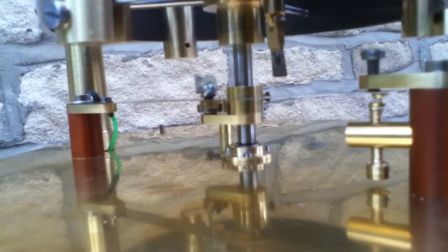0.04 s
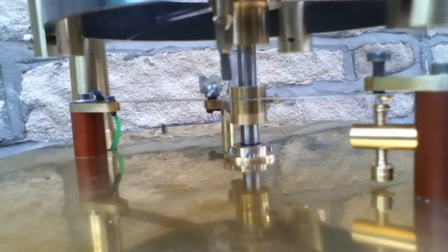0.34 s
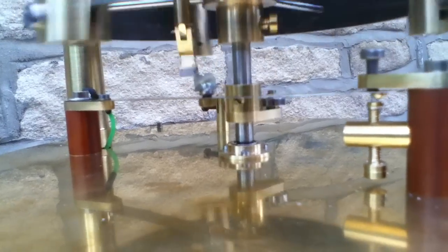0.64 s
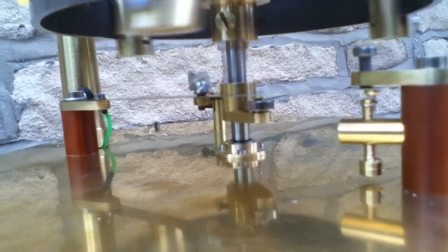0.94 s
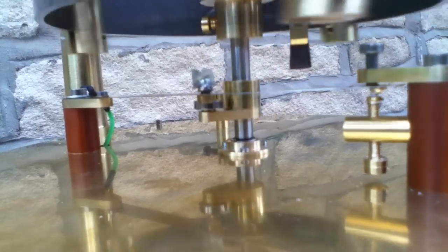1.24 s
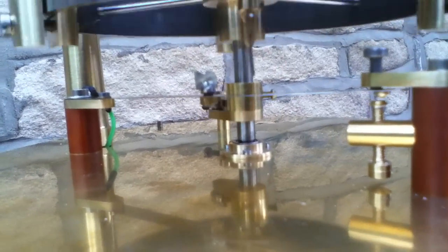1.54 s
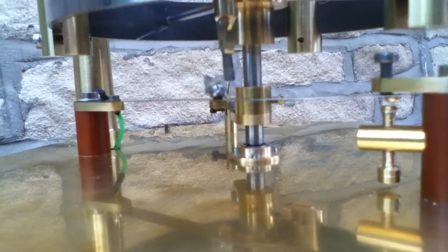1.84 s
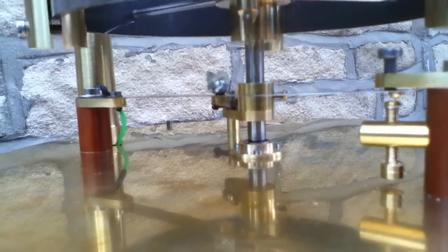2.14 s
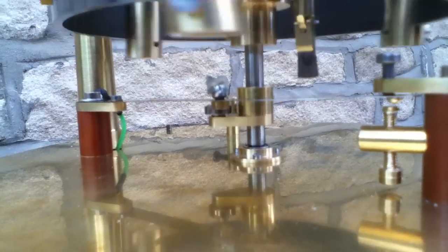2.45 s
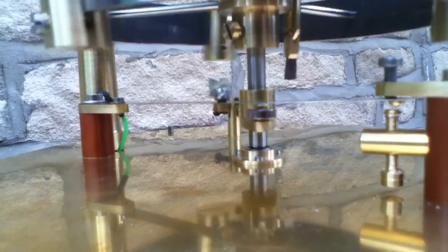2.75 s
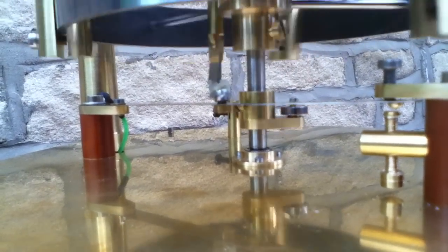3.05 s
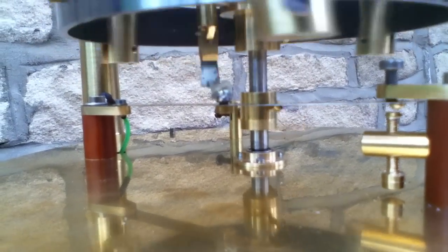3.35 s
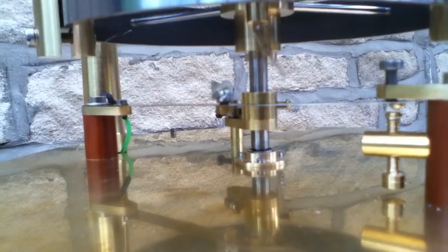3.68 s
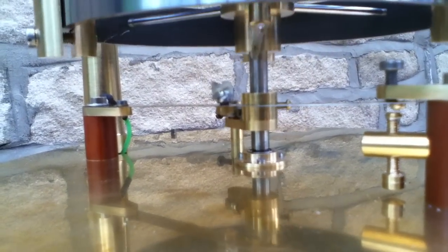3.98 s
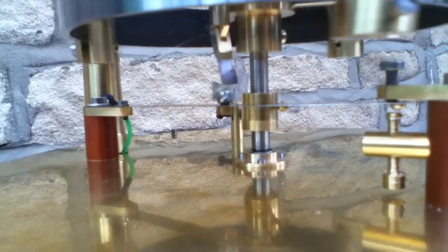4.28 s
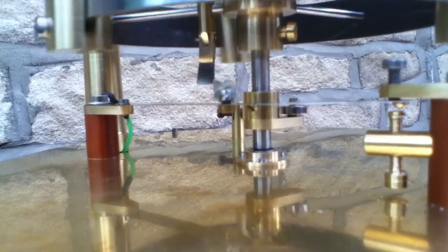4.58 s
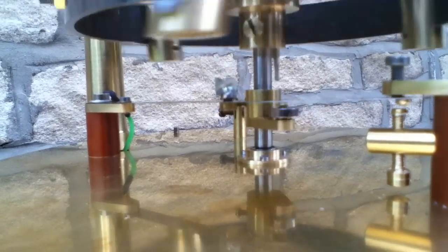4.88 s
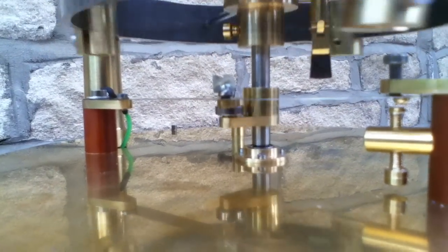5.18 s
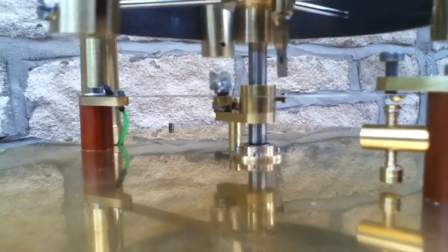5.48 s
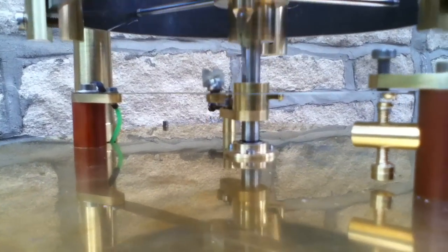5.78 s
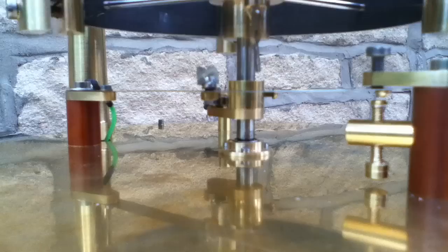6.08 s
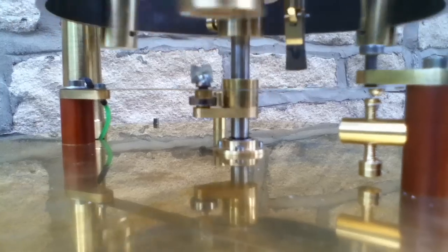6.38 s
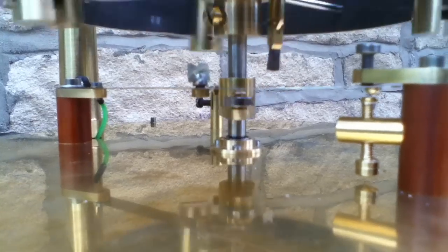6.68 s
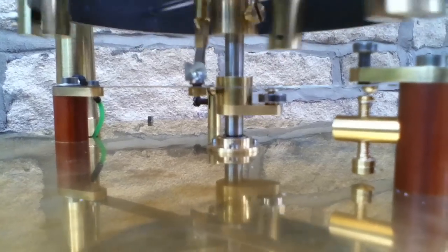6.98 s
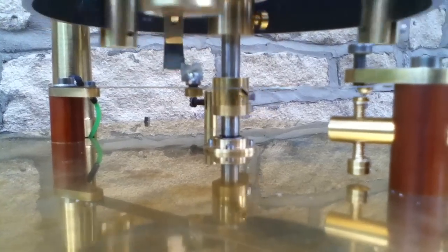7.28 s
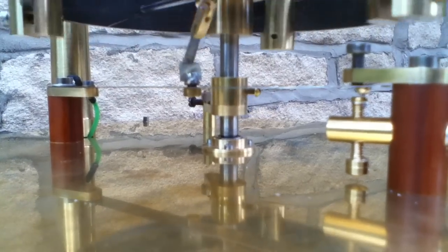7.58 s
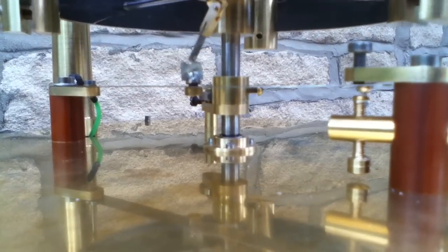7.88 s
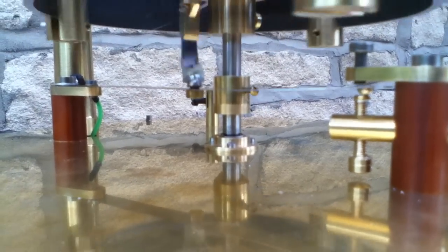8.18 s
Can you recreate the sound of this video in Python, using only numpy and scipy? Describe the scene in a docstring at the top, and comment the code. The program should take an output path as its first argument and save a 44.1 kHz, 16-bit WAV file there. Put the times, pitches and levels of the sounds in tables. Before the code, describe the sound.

A large clock balance wheel swings back and forth close to the microphone. Its loose metal fittings scrape, tick and faintly squeak, making the wheel ring, most busily at first. Four times a hanging toggle drags over a brass block and drops off with a sharp clack, with brief whirrs around it. At the end a thin spring buzzes and the toggle crashes onto the block. The quiet room has a low hiss, rumble and hum.

```python
"""A large clock balance wheel turns back and forth close by, over a quiet room's hiss, rumble and hum.
From the start its loose hanging fittings scrape, tick and squeak, ringing the wheel. At 0.5 s a hanging
toggle drags over a brass contact block and drops off with a sharp clack; it passes again at 3.5, 4.4
and 7.5 s, its hanger whirring on the way. Near 8.1 s the toggle flicks a thin contact spring and
crashes onto the block."""
import sys
import numpy as np
from scipy import signal
from scipy.io import wavfile
from scipy.ndimage import uniform_filter1d

SR = 44100
rng = np.random.default_rng(int(sys.argv[2]) if len(sys.argv) > 2 else 0)


def wav_out(sig):
    """Save sig, one row per channel (or a flat mono array), as 16-bit PCM at SR to the path in sys.argv[1]."""
    wavfile.write(sys.argv[1], SR, np.round(np.clip(np.atleast_2d(sig).T, -1, 1) * 32767).astype(np.int16))


N = 362943
TIME = np.arange(N) / SR
REBOUND_GAP_S = .017

# toggle passes over the block: touch t/s, far-edge catch t/s, drop t/s, slide/dB, catch/dB, drop/dB
TOGGLE_PASSES = [(0.502, 0.627, .65, -47.5, -29.5, -21), (3.482, 3.615, 3.648, -51.5, -35.5, -17.5),
                 (4.377, 4.503, 4.525, -48.5, -35.5, -23), (7.4885, 7.659, 7.699, -55.5, -34.5, -18)]
# envelope of dense weak modes: f/Hz, level/dB
WASH_SPECTRUM = [(150, -7.5), (450, -3), (950, -11.5), (1400, 3), (1750, -25), (2400, -14), (3200, 2),
                 (5000, 3.5), (7700, 2.5), (9300, -6.5), (11000, -8.5), (12800, -15), (15800, -21)]


def wheel(rub_db=-3, rub_rise_s=.013, rub_t60_s=.36, tick_db=-8, tick_rise_s=.004, tick_t60_s=.12):
    """Loose fittings drive the wheel by rubbing under uneven pressure and by short bursts of slip."""
    # t/s, length/s, level/dB, swell over the stroke/dB, brightness/dB
    rubs = [(0.097, 0.23, -68.5, 8.5, 17), (.26, 0.21, -53.5, 10, -4), (0.488, 0.2, -47.5, 0, -12.5),
            (0.687, 0.13, -36, -0.5, -3), (0.899, 0.34, -34, 0, 5), (1.636, .1, -51.5, -0.5, 4),
            (1.803, 0.41, -53, 0, -8), (2.8, 0.17, -48, 4, 4), (3.042, 0.084, -55.5, -2, -17.5),
            (3.31, .31, -51, -1, -6), (3.679, 0.2, -36.5, -11, 0), (4.041, 0.11, -59.5, 12, 1),
            (4.22, 0.41, -53, 4, -7.5), (4.868, 0.1, -54, 2.5, 3), (5.034, 0.035, -50, 0, 10),
            (5.181, 0.065, -49, -7, 2), (6.693, 0.035, -53, -1.5, 12), (6.875, 0.055, -57.5, 3.5, 15),
            (7.283, 0.33, -53, -4, -12), (7.958, 0.098, -61, 2, -20), (8.156, .07, -50, -2, -6)]
    # t/s, level/dB, brightness/dB
    ticks = [(0.6914, -22.5, 12), (0.7993, -40, -3), (.921, -20, 11.5), (1.0274, -27, -12),
             (1.095, -23, 12), (1.213, -24.5, 14), (1.6444, -32, 0), (1.6893, -36, 2), (1.7293, -36.5, 6),
             (1.7945, -31, -1), (1.8355, -31, 5), (1.8607, -32, 6), (1.8949, -29.5, 8), (1.94, -35.5, 8),
             (1.9624, -32.5, 1), (2.0389, -29.5, 10.5), (2.1219, -31.5, 6), (2.1611, -32, -2),
             (2.7216, -34, 6), (2.7997, -42.5, 18), (3.8413, -32.5, 13), (4.1994, -36.5, -8),
             (6.82, -48.5, 17)]
    push = np.zeros(N)
    for s, length_s, db, swell_db, bright_db in rubs:
        t = np.arange(0, length_s + rub_t60_s, 1 / SR)
        waver_db = 1.93 * wander(len(t), step_s=.032)
        pressure = amp(db + swell_db * np.minimum(t / length_s, 1) + waver_db)
        contact = np.minimum(t / rub_rise_s, 1) * fade(np.maximum(t - length_s, 0), rub_t60_s)
        rub = slips(len(t), per_s=3500, spread_db=3) * pressure * contact
        add(push, s, amp(rub_db) * brighten(rub, bright_db))
    t = TIME[:SR // 4]
    envelope = np.minimum(t / tick_rise_s, 1) * fade(t, tick_t60_s)
    for s, db, bright_db in ticks:
        burst = slips(len(t), per_s=9000, spread_db=2.5) * envelope
        add(push, s - tick_rise_s, amp(db + tick_db) * brighten(burst, bright_db))
    return wheel_body(push)


def wheel_body(push, wash_db=-11.5, wash_t60_s=.045):
    """The pushed wheel rings in clear modes over a crowd of weak, overlapping ones."""
    # f/Hz, width/Hz, level/dB
    modes = [(1262, 8.3, 4), (1972, 19, 2.5), (2214, 110, -4), (2587, 31, -3), (3072, 34, 4.5),
             (3287, 126, 4.5), (3394, 33, 4), (4320, 60, -4), (5698, 23, 1), (5724, 42, 0.5), (6200, 19, 6),
             (6540, 150, -4.5), (7610, 115, 4.5), (7630, 26, -7), (8090, 50, -29), (8610, 82, -10),
             (9800, 28, -2.5), (9740, 35, -19)]
    tap = signal.unit_impulse(SR // 8)
    clear = sum(amp(db) * resonate(tap, hz, width_hz) for hz, width_hz, db in modes)
    crowd = rng.standard_normal(len(tap)) * fade(TIME[:len(tap)], wash_t60_s)
    wash = colour(.5 * tap + crowd / np.linalg.norm(crowd), WASH_SPECTRUM)
    response = clear + amp(wash_db) * wash
    return signal.fftconvolve(push, response / np.linalg.norm(response))[:N]


def blows(clack_t60_s=.057, touch_t60_s=.065, rebound_db=-14.5, loss_db=2.5):
    """Toggle hits on the block: t/s, level/dB, t60/s, brightness/dB, base plate thud/dB."""
    # knocks outside the passes, then the crash: t/s, level/dB, brightness/dB
    knocks = [(5.2041, -40.5, -6.5), (6.641, -52, -16), (7.792, -38.5, -4), (7.839, -45, -11),
              (8.038, -44, -20.5), (8.105, -25, 13), (8.1133, -10, 8), (8.128, -13.5, 6), (8.145, -27, 15),
              (8.153, -17.5, -4), (8.163, -23.5, 0)]
    rows = [(s, db, clack_t60_s, bright_db, 0) for s, db, bright_db in knocks]
    for touch_s, catch_s, drop_s, _, catch_db, drop_db in TOGGLE_PASSES:
        rows.append((touch_s, -29, touch_t60_s, 1.5, 5))
        rows.append((catch_s, catch_db, touch_t60_s, -6.5, 0))
        rows.append((drop_s, drop_db, clack_t60_s, -4.5, 0))
        for k in range(3):
            rebound_s = drop_s + (k + 1) * REBOUND_GAP_S
            rows.append((rebound_s, drop_db + rebound_db - k * loss_db, clack_t60_s, -6.5, 0))
    return rows


def clacks(gain_db=-5, ring_db=-10, snap_db=-12, vary_db=5, rise_s=.0022, plate_hz=2300):
    """Each blow snaps, cracks and rings the block; the contact point shifts the mix of modes."""
    # toggle and block: f/Hz, level/dB, t60/s
    modes = [(720, -23, .08), (1040, -16, .08), (1232, -6, .11), (1310, -12, .08), (1410, -14, .07),
             (1600, -8, .07), (1900, -10, .09), (2516, -12, .16), (3473, -5, .1), (3595, -7, .07),
             (3770, -7, .06), (3887, -3, .1), (3939, -2, .1), (4388, -6, .1), (4452, -1, .12),
             (4720, -8, .07), (4800, -8, .07), (4991, -7, .09), (5350, -8, .09), (5569, -5, .1),
             (6640, -9, .06), (7020, -13, .09), (7524, -3, .12), (7956, -5, .12), (8800, -14, .1),
             (9848, -15, .13), (11165, -15, .08), (13790, -22, .18), (14163, -20, .11)]
    # f/Hz, level/dB
    crack_spectrum = [(200, -25), (900, -21.5), (1250, -18.5), (2200, -10), (2900, -14.5), (3600, 10),
                      (4700, -1.5), (6000, -1.5), (6900, -2), (7250, -0.5), (7600, -5), (11300, -11),
                      (12700, -24), (15800, -28)]
    out, t = np.zeros(N), TIME[:SR // 4]
    hz, mode_db, mode_t60_s = np.transpose(modes)[:, :, None]
    for s, db, t60_s, bright_db, thud_db in blows():
        gains = amp(mode_db + vary_db * rng.uniform(-1, 1, hz.shape) + thud_db * (hz < plate_hz))
        partials = np.sin(2 * np.pi * (hz * t + rng.random(hz.shape)))
        ring = (gains * fade(t, mode_t60_s) * partials).sum(0)
        spectrum = [(f, level + thud_db * (f < plate_hz)) for f, level in crack_spectrum]
        crack = unit(colour(slips(len(t), per_s=11000, spread_db=-.3), spectrum)) * fade(t, t60_s)
        crack = brighten(crack, 9 * fade(t, t60_s=.017) - 2)  # first contact is hardest
        blow = (crack + amp(ring_db) * ring) * np.minimum(t / rise_s, 1)
        blow /= np.std(blow[:SR // 200])
        snap = amp(snap_db) * unit(np.diff(rng.standard_normal(len(t) + 1))) * fade(t, t60_s=.0083)
        add(out, s - rise_s, amp(db + gain_db) * (brighten(blow, bright_db) + snap))
    return out


def drags(settle_s=.107, settle_db=-33):
    """The toggle's edge chatters across the block, and again as it settles after the drop."""
    # f/Hz, width/Hz, level/dB
    rasp_modes = [(2410, 22, 7), (3760, 260, -7), (3960, 164, 7), (4540, 73, -2), (6450, 290, 0),
                  (7400, 43, -16), (8100, 52, -5), (12040, 80, -20)]
    out = np.zeros(N)
    for touch_s, _, drop_s, slide_db, _, drop_db in TOGGLE_PASSES:
        slide = (touch_s, drop_s - touch_s, slide_db)
        settle = (drop_s + REBOUND_GAP_S, settle_s, drop_db + settle_db)
        for s, length_s, db in (slide, settle):
            count = round(length_s * SR)
            push = slips(count, per_s=1200, spread_db=4)
            rasp = sum(amp(level) * resonate(push, hz, width_hz) for hz, width_hz, level in rasp_modes)
            add(out, s, amp(db) * unit(rasp) * signal.windows.tukey(count, .2))
    return out


def spring(buzz_db=-15):
    """The flicked contact spring buzzes against the toggle, which keeps its modes ringing."""
    # t/s, level/dB, buzz t60/s
    flicks = [(8.072, -45.5, 0.038), (8.096, -25, 0.12), (8.205, -28.5, 0.061), (8.217, -39, 0.064)]
    # f/Hz, level/dB, ring time scale/s
    modes = [(1280, 10, 0.091), (3860, -7.5, .015), (4450, 5.5, 0.025), (5640, 11.5, 0.039),
             (6000, -4, 0.032), (7200, -19, .04), (7600, -7, .03), (8450, -2, 0.036), (11200, 10, 0.036),
             (14180, -13, .06)]
    out, t = np.zeros(N), TIME[:SR // 5]
    for s, db, t60_s in flicks:
        buzz = slips(len(t), per_s=5000, spread_db=1.5) * fade(t, t60_s)
        push = buzz + 15 * signal.unit_impulse(len(t))
        ring = sum(amp(level) * resonate(push, hz, 1.5 / ring_s) for hz, level, ring_s in modes)
        ring += amp(buzz_db) * colour(buzz, WASH_SPECTRUM)
        add(out, s, amp(db) * ring / np.std(ring[:SR // 100]))
    return out


def whirrs(centre_hz=3300, half_width_hz=130, wander_hz=60, creep_s=.016):
    """The dragged hanger's slips feed one resonance whose pitch wanders as the contact creeps."""
    # t/s, length/s, level/dB
    strokes = [(.35, .15, -54), (.69, .055, -37), (3.315, .13, -50.5), (3.74, .12, -48), (4.28, .1, -55),
               (4.56, .13, -50.5), (7.305, .14, -54)]
    out = np.zeros(N)
    lowpass = signal.butter(2, half_width_hz, fs=SR, output="sos")
    for s, length_s, db in strokes:
        count = round(length_s * SR)
        hz = centre_hz + wander_hz * wander(count, creep_s)
        carrier = np.exp(2j * np.pi * np.cumsum(hz) / SR)
        push = slips(count, per_s=2500, spread_db=2.5)
        whirr = (carrier * signal.sosfilt(lowpass, push / carrier)).real  # moving band-pass
        add(out, s, amp(db) * unit(whirr) * signal.windows.tukey(count, .4))
    return out


def ringing_tones(rise_fraction=.035, ping_s=.063, ping_hz=12040, ping_db=-9):
    """Single modes ring unsteadily: friction squeaks, the struck block, the toggle edge's pings."""
    # squeaks, and the block's brief 2.5 kHz ring after a blow: t/s, length/s, f/Hz, level/dB
    tones = [(1.03, .28, 5720, -45), (1.79, .48, 1280, -61), (1.82, .45, 6060, -60), (1.85, .5, 168, -61),
             (2.8, .27, 7720, -61), (3.84, .035, 10350, -53), (4.88, .2, 3050, -65),
             (5.04, .08, 10010, -62), (6.708, .06, 9850, -62), (6.89, .08, 10020, -65),
             (7.7, .08, 2520, -54), (8.04, .05, 2520, -55)]
    pings = [(s, ping_s, ping_hz, slide_db + ping_db)
             for touch_s, catch_s, _, slide_db, *_ in TOGGLE_PASSES for s in (touch_s, catch_s)]
    out = np.zeros(N)
    for s, length_s, hz, db in tones + pings:
        progress = np.linspace(0, 1, round(length_s * SR))
        envelope = np.minimum(progress / rise_fraction, 1) * np.sqrt(1 - progress)
        width_hz = 28 * np.sqrt(hz / 1000)
        tone = resonate(resonate(rng.standard_normal(SR), hz, width_hz), hz, 4 * width_hz)
        add(out, s, amp(db) * unit(tone[-len(envelope):] * envelope))
    return out


def room(x, reflections_per_s=3000, delay_s=.006):
    """Sparse reflections of random sign; the treble dies first."""
    # f/Hz, t60/s
    decay = [(300, 0.17), (1500, 0.56), (5000, 0.079), (14000, 0.054)]
    count = SR // 2
    taps = rng.choice([-1., 1.], count) * (rng.random(count) < reflections_per_s / SR)
    hz, t, spectra = signal.stft(taps * (TIME[:count] > delay_s), SR, nperseg=256)
    _, tail = signal.istft(spectra * fade(t, curve_at(decay, hz)[:, None]), SR, nperseg=256)
    return signal.fftconvolve(x, tail / np.linalg.norm(tail))[:N]


def background(air_db=-56, rumble_db=-61):
    """Even hiss, a swelling rumble and a wavering low hum."""
    # f/Hz, level/dB
    air_spectrum = [(12, -41), (20, -26), (38, -5.5), (65, -6.5), (86, -0.5), (123, -2.5), (187, -4),
                    (459, -9), (513, -8), (558, -16), (1090, -16), (1290, -18.5), (1530, -20),
                    (14700, -28.5), (16000, -44)]
    # f/Hz, level/dB
    rumble_spectrum = [(60, -22.5), (125, -2), (170, -2), (230, 0.5), (320, -10), (480, -5.5), (800, -11),
                       (1500, -37)]
    # centre t/s, half width/s, rise/dB
    swells = [(.05, .08, 4.5), (1.1, 0.27, 8.5), (5.06, 0.076, 6.5), (6.0, .3, 3)]
    # f/Hz, nominal width/Hz, level/dB
    hum_lines = [(50.5, 4.9, -70), (97.42, 1.3, -65)]
    air = amp(air_db) * unit(colour(rng.standard_normal(N), air_spectrum))
    swell_db = sum(db * np.exp(-((TIME - s) / width_s) ** 2) for s, width_s, db in swells)
    rumble = amp(rumble_db + swell_db) * unit(colour(rng.standard_normal(N), rumble_spectrum))
    hum = np.zeros(N)
    for hz, width_hz, db in hum_lines:
        band = resonate(rng.standard_normal(N + SR), hz, 2 * width_hz)
        hum += amp(db) * unit(resonate(band, hz, 2 * width_hz)[SR:])
    return air + rumble + hum


def slips(count, per_s, spread_db):
    """Tiny contacts between rough metal faces, random in time and size."""
    size = amp(spread_db * np.minimum(rng.exponential(1, count), 4))
    return unit(size * rng.choice([-1, 1], count) * (rng.random(count) < per_s / SR))


def wander(count, step_s):
    """Random drift, rms about 1, changing in about step_s."""
    size = max(int(step_s * SR), 1)
    drift = uniform_filter1d(rng.standard_normal(count + SR), size)
    return unit(uniform_filter1d(drift, size))[SR // 2:][:count]


def resonate(x, hz, width_hz):
    """One resonance, gain 1 at its centre."""
    r = np.exp(-np.pi * width_hz / SR)
    return signal.lfilter([1 - r, 0, r - 1], [1, -2 * r * np.cos(2 * np.pi * hz / SR), r * r], x)


def colour(x, points, size=4096):
    """Minimum-phase filter through (f/Hz, level/dB) points."""
    log_gain = np.log(amp(curve_at(points, abs(np.fft.fftfreq(size, 1 / SR)))))
    taps = np.fft.ifft(np.exp(np.conj(signal.hilbert(log_gain)))).real
    return signal.fftconvolve(x, taps[:size // 2])[:len(x)]


def brighten(x, bright_db, pivot_hz=4800):
    """Tilts treble against body."""
    body = signal.sosfilt(signal.butter(1, pivot_hz, fs=SR, output="sos"), x)
    return body * amp(-bright_db / 2) + (x - body) * amp(bright_db / 2)


def curve_at(points, hz):
    """Interpolates (f/Hz, value) points over log frequency."""
    f, value = np.transpose(points)
    return np.interp(np.log(hz + 1), np.log(f + 1), value)


def fade(t, t60_s):
    """Falls 60 dB in t60_s."""
    return 1e-3 ** (t / t60_s)


def amp(db):
    """Decibels to gain."""
    return 10 ** (np.asarray(db) / 20)


def unit(x):
    """Scales to rms 1."""
    return x / np.sqrt(np.mean(x ** 2) + 1e-20)


def add(mix, s, sound):
    """Mixes a sound in at s seconds."""
    part = mix[max(round(s * SR), 0):][:len(sound)]
    part += sound[:len(part)]


def scene(room_db=-15):
    """The mechanism close by, with a little room; mono."""
    clock = wheel() + whirrs() + ringing_tones() + clacks() + spring() + drags()
    return (clock + amp(room_db) * room(clock) + background())[None]


def record(dry, cutoff_hz=16200):
    """Steep low-pass."""
    taps = signal.firwin(511, cutoff_hz, window=("kaiser", 9), fs=SR)
    return signal.oaconvolve(dry, taps[None], "same")


dry = scene()
out = record(dry)
wav_out(out)
```